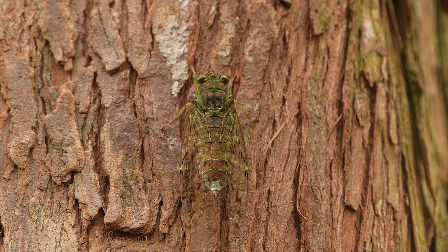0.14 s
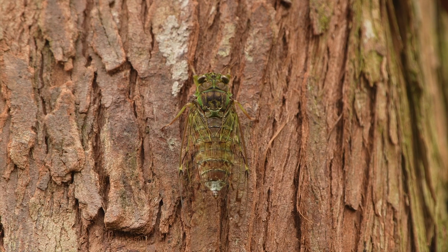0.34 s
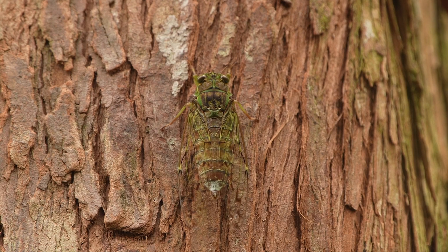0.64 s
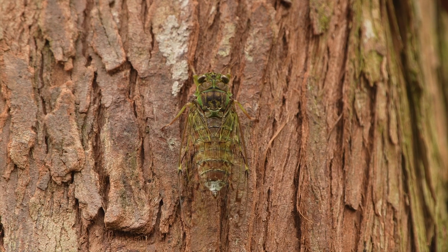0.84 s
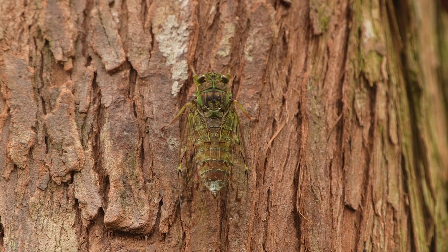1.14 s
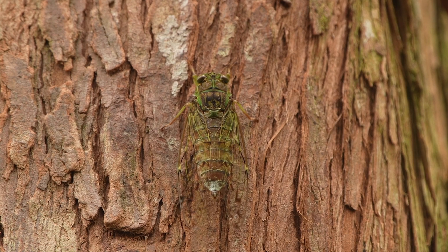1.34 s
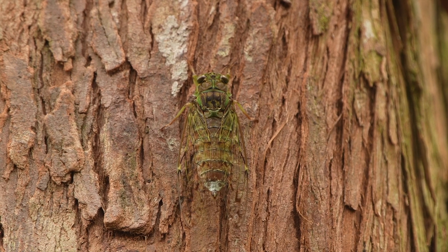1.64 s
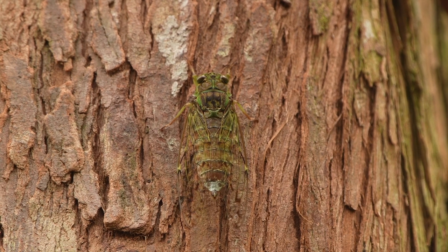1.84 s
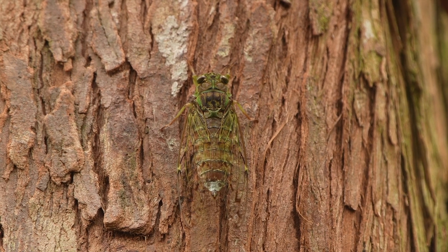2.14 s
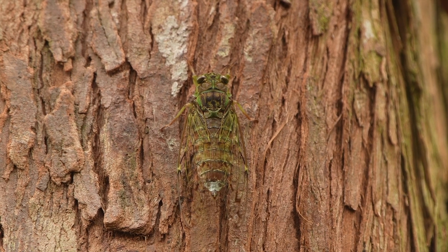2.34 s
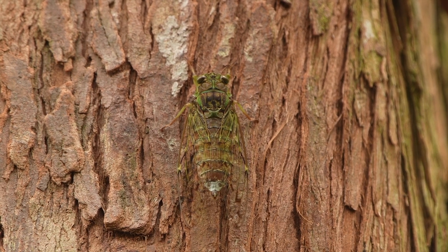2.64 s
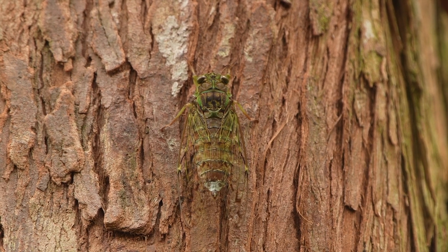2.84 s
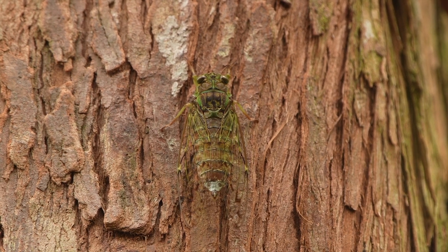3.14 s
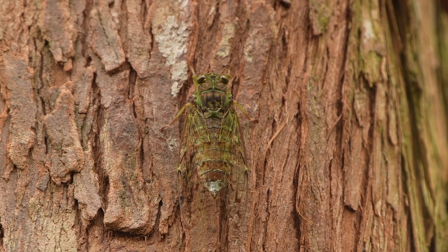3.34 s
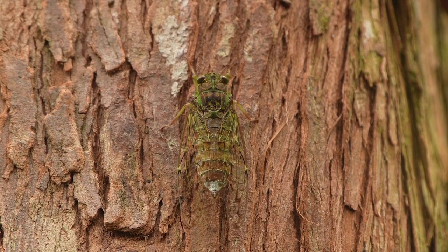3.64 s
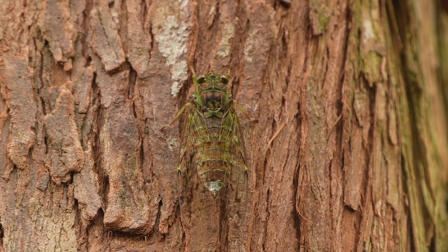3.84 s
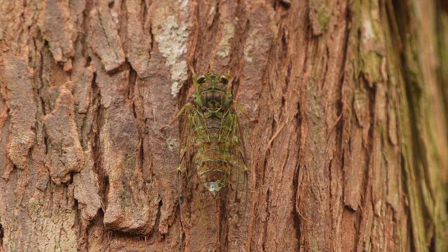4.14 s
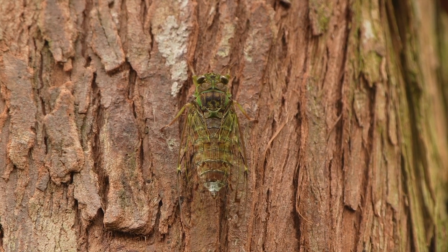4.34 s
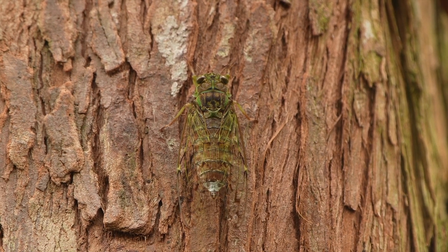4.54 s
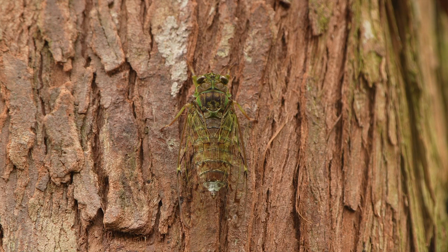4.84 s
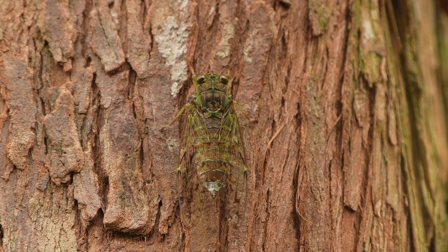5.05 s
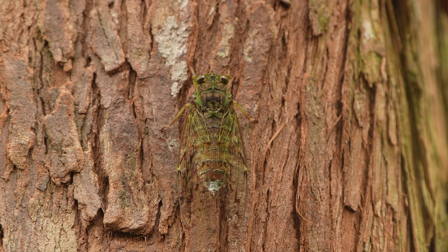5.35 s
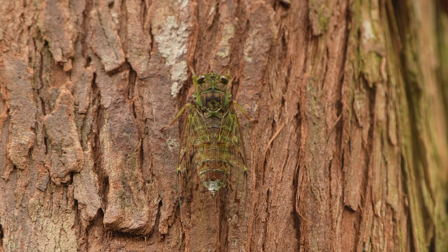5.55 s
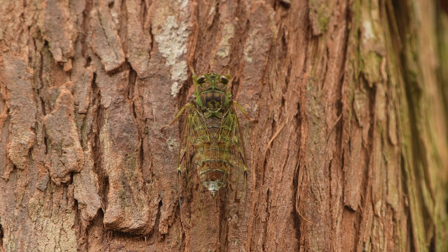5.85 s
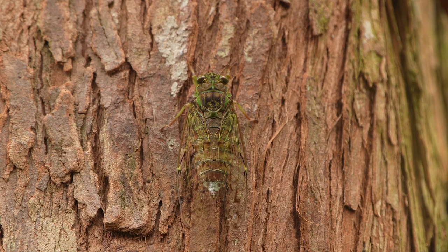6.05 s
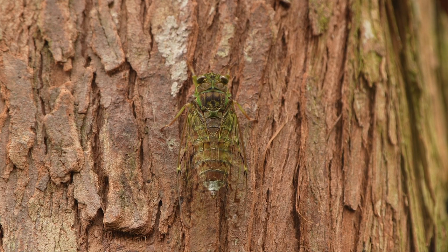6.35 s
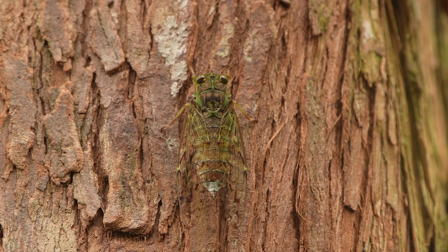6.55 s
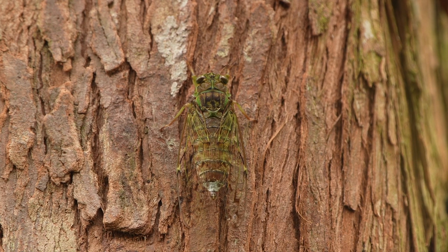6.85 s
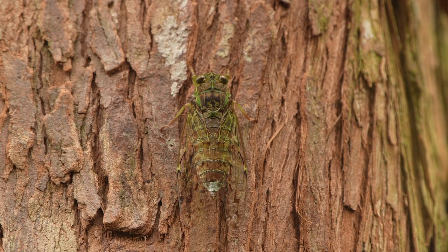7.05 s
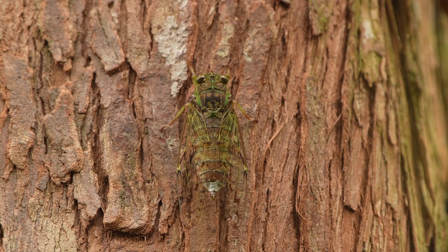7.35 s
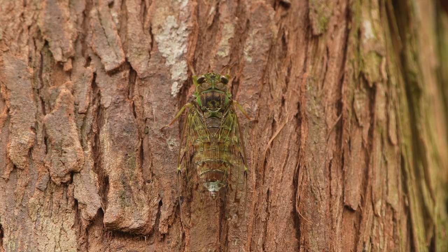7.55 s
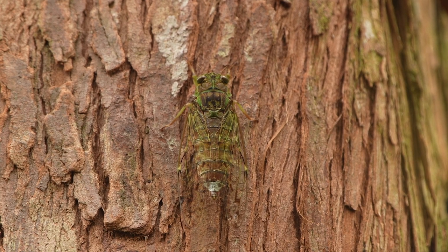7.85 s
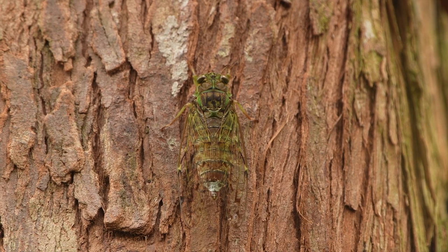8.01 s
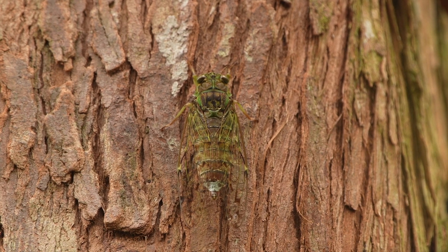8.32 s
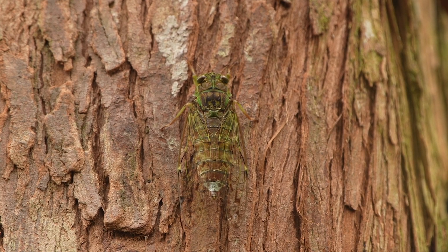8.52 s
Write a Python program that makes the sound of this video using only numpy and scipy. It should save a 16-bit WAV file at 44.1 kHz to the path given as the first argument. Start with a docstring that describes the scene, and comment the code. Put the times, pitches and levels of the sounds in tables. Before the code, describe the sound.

A close cicada's high buzz swells, breaks into short phrases and stops, leaving distant cicadas and a low forest murmur.

```python
"""Cicada on a tree trunk

Close to the microphone a cicada's buzz swells, is chopped into short phrases, and stops. Each pulse of
the buzz is a run of tymbal ribs buckling one after another into a ringing abdomen. Further off a second
cicada fades away, leaving the distant chorus and the low murmur of the forest."""
import sys
import numpy as np
from scipy import signal
from scipy.fft import rfft, irfft, next_fast_len
from scipy.io import wavfile
from scipy.ndimage import uniform_filter1d

SR = 44100
rng = np.random.default_rng(int(sys.argv[2]) if len(sys.argv) > 2 else 0)


def transcribe(u):
    """Save the signal u as a 16-bit wav file named by the first command-line argument.

    u: samples, shape (n,) or (channels, n), limited to [-1, 1]; the rate is SR.
    q: integer samples, one column per channel.
    """
    v = np.clip(np.atleast_2d(u).T, -1, 1)
    q = np.round(v * 32767).astype(np.int16)
    wavfile.write(sys.argv[1], SR, q)


N = 382788
TIME = np.arange(N) / SR

# phrases of the near cicada; after a long rest the muscle starts slowly:
# (first pulse [s], end [s], rate shortfall at the start [pulses/s])
PHRASES = [(0.3004, 1.488, 30), (1.5186, 1.842, 0), (1.8805, 2.215, 1), (2.2532, 2.588, 1),
           (2.6353, 2.973, 3), (3.0148, 3.345, 0), (3.3943, 3.701, 4), (3.7909, 4.048, 26)]
# its muscle speeds up through the long first phrase, then tires: (time [s], rate [pulses/s])
CRUISING_RATE = [(.3, 156), (1.6, 163.3), (2.15, 160), (4.05, 158.3)]


def amp(db):
    """Decibels to gain."""
    return 10 ** (np.asarray(db) / 20)


def unit(x):
    """Scales to an rms of one."""
    return x / np.sqrt(np.mean(x ** 2) + 1e-20)


def follow(rows, t):
    """Every column of a curve at the times t."""
    times, *columns = np.transpose(rows)
    return [np.interp(t, times, column) for column in columns]


def spectrum(points, hz):
    """Reads a table along a logarithmic frequency axis."""
    f, value = np.transpose(points)
    return np.interp(np.log(hz + 1), np.log(f), value)


def drift(count, cycles):
    """A smooth random curve of rms one that turns at most about `cycles` times."""
    size = next_fast_len(count)
    k = np.arange(size // 2 + 1)
    slow = rfft(rng.standard_normal(size)) * np.exp(-(k / cycles) ** 2) * (k > 0)
    return unit(irfft(slow, size)[:count])


def causal(db):
    """The response with this gain that rings only after it is struck."""
    log_gain = np.log(amp(np.r_[db, db[-2:0:-1]]))
    return np.exp(np.conj(signal.hilbert(log_gain)))[:len(db)]


def forest_air(level_db=-55):
    """The low, steady murmur of the forest all round the microphone."""
    # colour of the air: (frequency [Hz], relative density [dB])
    air_colour = [(15, -8), (40, -6), (100, -3), (190, -0.5), (350, -4), (600, -8), (1000, -13.5),
                  (1500, -17.5), (3000, -21.5), (6000, -37), (15000, -32.5)]
    gain = amp(spectrum(air_colour, np.fft.rfftfreq(N, 1 / SR)))
    return amp(level_db) * unit(irfft(rfft(rng.standard_normal(N)) * gain, N))


def far_song(bands, pitch, flutter_db, flutter_hz, own_db):
    """Trees smear far cicadas' pulses into bands of hiss, which flutter together and each on its own."""
    cycles = flutter_hz * N / SR
    together = drift(N, cycles)
    clock = np.cumsum(pitch * np.ones(N)) / SR
    offset_hz = np.fft.fftfreq(next_fast_len(N), 1 / SR)
    out = 0
    for hz, width, db in bands:
        phases = np.exp(2j * np.pi * rng.random(len(offset_hz)))
        smear = np.fft.ifft(phases * (1 + (2 * offset_hz / width) ** 2) ** -1.5)[:N]
        band = unit((smear * np.exp(2j * np.pi * hz * clock)).real)
        out += amp(db + own_db * drift(N, cycles)) * np.sqrt(width) * band
    return unit(out * amp(flutter_db * together))


def distant_chorus(level_db=-50):
    """Cicadas deep in the forest merge into an unbroken hiss."""
    # song bands: (centre [Hz], width [Hz], relative density [dB])
    bands = [(2136, 584, -3.5), (2880, 770, -22.5), (4075, 670, 0.5), (4450, 800, -9), (6100, 1060, -12),
             (6720, 1100, -13), (8170, 1000, -8.1), (8960, 1700, -16), (10070, 1650, -19),
             (11869, 2122, -29.5)]
    return amp(level_db) * far_song(bands, pitch=1, flutter_db=0.37, flutter_hz=9.1, own_db=0.8)


def whistles(waver_rate_hz=22, flicker_db=2):
    """Thin, wavering tones: the second cicada's fundamental near 2335 Hz sounds through its phrases, and
    fainter tones linger among the far insects."""
    # tones: (start [s], end [s], pitch [Hz], waver depth [Hz], level [dB]); the first two rows are the second
    # cicada's fundamental during its phrases
    tones = [(0, 5.15, 2335, 9, -57), (5.27, 5.92, 2334, 5, -54), (0, 8.7, 2478, 14, -65),
             (5.9, 8.7, 2334, 12, -67)]
    out, cycles = 0, waver_rate_hz * N / SR
    for start, end, hz, waver, db in tones:
        gate = uniform_filter1d(1. * (TIME >= start) * (TIME < end), size=3000)
        tone = np.sin(2 * np.pi * np.cumsum(hz + waver * drift(N, cycles)) / SR)
        out += gate * amp(db) * unit(tone * amp(flicker_db * drift(N, cycles)))
    return out


def second_cicada(attack_s=0.2, release_s=.12):
    """Some way off, one long phrase and two short ones, each swelling and dying away."""
    # song bands at pitch factor one: (centre [Hz], width [Hz], relative density [dB])
    bands = [(2299, 520, -0.5), (3030, 780, -15), (4127, 700, -2.5), (4637, 550, 0.5), (6510, 970, -4.5),
             (6970, 750, -2.5), (8270, 450, -5), (9020, 1480, -2.5), (10920, 3100, -14.5),
             (11747, 1396, -45)]
    # phrases: (start [s], start of release [s])
    phrases = [(-.12, 5.1), (5.115, 5.5), (5.54, 5.89)]
    # the pitch is pushed up as the strength ebbs: (time [s], level [dB], pitch [factor])
    effort = [(0, -46, 0.93), (1.5, -43, 0.95), (4.72, -43.5, .95), (4.95, -46, 0.97), (5.4, -47.5, 1),
              (5.9, -48.5, .992)]
    db, pitch = follow(effort, TIME)
    gate = sum(np.clip(np.minimum((TIME - start) / attack_s, 1 - (TIME - end) / release_s), 0, 1)
               for start, end in phrases)
    return gate * amp(db) * far_song(bands, pitch, flutter_db=0.8, flutter_hz=13, own_db=1.0)


def echoes(x, wait_s, t60, dull_hz, density=.1):
    """Sparse reflections of random sign that die away; bark and leaves soak up their treble."""
    t = np.arange(SR // 2) / SR
    taps = rng.choice([-1., 1.], len(t)) * (rng.random(len(t)) < density)
    taps *= (t > wait_s) * amp(-60 * t / t60)
    taps /= np.linalg.norm(taps) + 1e-20
    return signal.lfilter(*signal.butter(1, dull_hz, fs=SR), signal.oaconvolve(x, taps)[:N])


def wind_up(t, time_s, shape=1):
    """Falls from one to zero as the near song gets under way."""
    return np.exp(-(np.maximum(t - PHRASES[0][0], 0) / time_s) ** shape)


def slackness(t, tighten_s=0.15, tiring_from_s=2.6, tiring_per_s=0.059):
    """How slack the tymbal is, 0-1: wholly at first, and slightly again as the insect tires."""
    return wind_up(t, tighten_s, shape=1.3) + tiring_per_s * np.maximum(t - tiring_from_s, 0)


def phrase_beats(start, end, shortfall_hz, pickup_s=.055, sag_hz=2.48, sag_s=0.0596):
    """The muscle fires once a turn; over a phrase its rate picks up, cruises and sags."""
    t = np.arange(start, end, 1 / SR)
    slow_start = shortfall_hz * np.exp((start - t) / pickup_s)
    sag = sag_hz * np.exp((t - end) / sag_s)
    turns = np.cumsum(follow(CRUISING_RATE, t)[0] - slow_start - sag) / SR
    return np.interp(np.arange(0, turns[-1]), turns, t)


def pulse_times():
    """The muscle's beats wander, jitter, and limp as the two tymbals take turns."""
    # beats that the muscle misses: (time [s])
    missed_beats = [1.715, 1.93, 2.117, 2.522]
    t = np.concatenate([phrase_beats(*phrase) for phrase in PHRASES])
    t = np.delete(t, [np.argmin(abs(t - missed)) for missed in missed_beats])
    looseness = 0.041 + 0.0095 * t + 0.043 * slackness(t)
    wander = 2.93 * drift(len(t), cycles=34)
    limp = 0.47 * (-1) ** np.arange(len(t)) * drift(len(t), cycles=40)
    jitter = 0.88 * rng.standard_normal(len(t))
    late_ms = looseness * (wander + limp + jitter)
    return t + late_ms / 1000


def tymbal(t, hz, slack, stall_db_per_ms=8.0, stretch=.025, first_snap_db=6):
    """Each pull snaps the ribs in turn; when slack, the first cracks harder, the last lag, weak and dull."""
    # ribs of a taut tymbal in buckling order: (delay [ms], relative level [dB], treble corner [Hz])
    ribs = [(0., 4, 4300), (.36, 8.5, 7470), (.815, 5, 16800), (1.277, 2.5, 14900), (1.738, -2, 15600),
            (2.2, -3, 14000), (2.66, -9.5, 10900), (3.15, -6, 5900)]
    # colour of one snap: (frequency [Hz], relative level [dB])
    snap_colour = [(1100, -39.5), (1550, -9.5), (1950, -5), (2800, -9.5), (3500, -7), (4400, -0.5),
                   (5300, -16), (6400, 0.5), (7600, -2.5), (8700, 1.5), (9900, -1.5), (10900, -6),
                   (12200, -13.5), (15200, -24)]
    chance = rng.standard_normal((len(t), len(ribs) + 1))
    pace = 1 + stretch * slack + .004 * chance[:, -1]
    scatter_db = .4 * chance
    snaps = 0
    for k, (ms, db, dull_hz) in enumerate(ribs):
        stall = slack * max(ms - 1.1, 0)  # only the later ribs stall
        delay_s = (t * SR % 1) / SR + (1 + ms * pace + .11 * stall) / 1000
        force = amp(db + scatter_db[:, k] - stall_db_per_ms * stall + first_snap_db * slack * (k == 0))
        corner_hz = dull_hz / (1 + 0.7 * slack + 1.1 * stall)
        rolloff = np.exp(-(hz / corner_hz[:, None]) ** 2)
        snaps += force[:, None] * rolloff * np.exp(-2j * np.pi * delay_s[:, None] * hz)
    return snaps * causal(spectrum(snap_colour, hz))


def abdomen(t, hz, slack, settle_s=0.36, damping_hz=200):
    """The body's resonances glide as it settles into singing shape; a slack tymbal damps them."""
    # resonances: (frequency [Hz], width [Hz], gain [factor], shift before settling [Hz])
    modes = [(2204, 330, 0.92, -30), (2750, 51, 2.2, 430), (3850, 220, 0.88, 0), (5970, 400, 1.75, 0),
             (7400, 260, 1.2, 2), (8710, 430, 0.72, 0), (12900, 930, 0.66, 0)]
    unsettled = wind_up(t, settle_s)[:, None]
    return 1 + sum(gain / (1 + 2j * (hz - f - shift * unsettled) / (width + damping_hz * slack[:, None]))
                   for f, width, gain, shift in modes)


def near_cicada(song_db=-26, slack_db=-9, size=1024, lead_s=.0016):
    """Right at the microphone, rib snaps ring the abdomen; the buzz swells as the tymbal tightens."""
    t, hz = pulse_times(), np.fft.rfftfreq(size, 1 / SR)
    slack = slackness(t)
    pulses = -irfft(tymbal(t, hz, slack) * abdomen(t, hz, slack))  # the ribs buckle inwards
    period = SR / follow(CRUISING_RATE, t)[0]
    buzz_rms = np.linalg.norm(pulses, axis=1) / np.sqrt(period)
    pulses *= (amp(song_db + slack_db * slack) / buzz_rms)[:, None]
    starts = (t * SR).astype(int) - round(lead_s * SR)
    out = np.zeros(N)
    np.add.at(out, starts[:, None] + np.arange(size), pulses)
    return out


def scene():
    """One microphone by the trunk: the cicada and its reflections, over the far insects and the air."""
    song = near_cicada()
    bark = amp(-11.5) * echoes(song, wait_s=.002, t60=0.07, dull_hz=8200)
    trees = amp(-25.5) * echoes(song, wait_s=0.032, t60=0.29, dull_hz=7000)
    background = distant_chorus() + forest_air() + second_cicada() + whistles()
    return (background + trees + bark + song)[None]


def record(dry, edge_hz=15850):
    """The recorder's band limit cuts off the highest treble."""
    lowpass = signal.firwin(401, edge_hz, window=("kaiser", 9), fs=SR)
    return signal.oaconvolve(dry, lowpass[None], "same")


dry = scene()
out = record(dry)
transcribe(out)
```